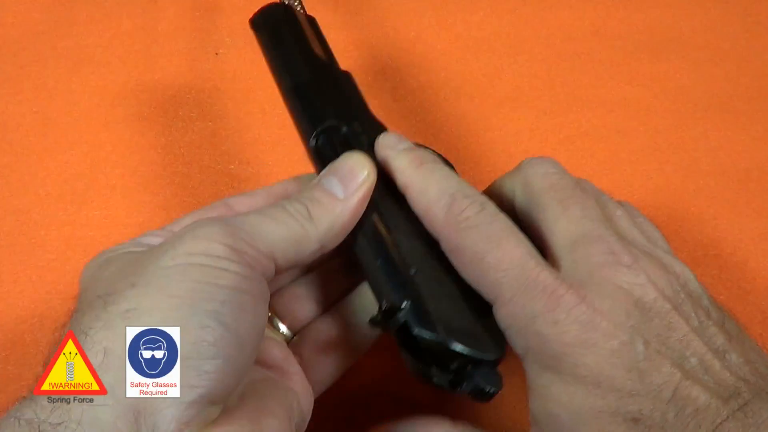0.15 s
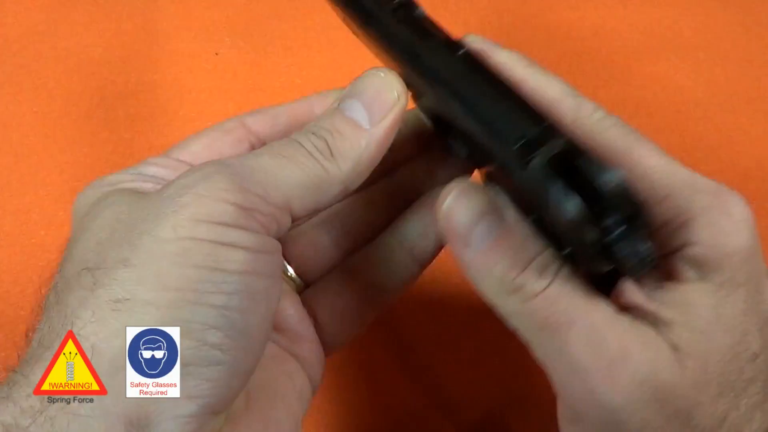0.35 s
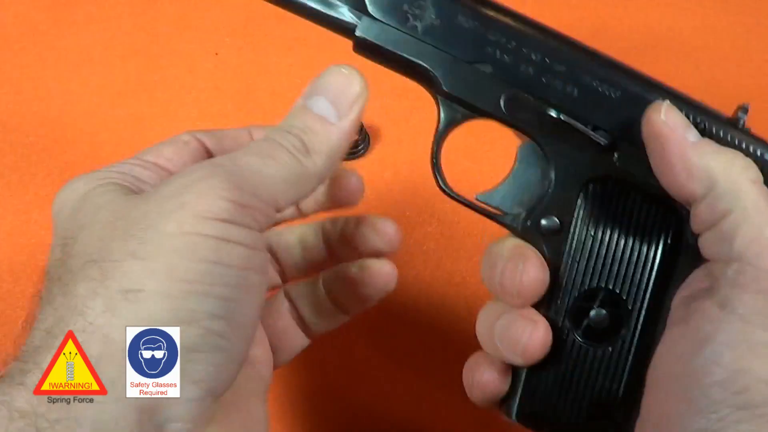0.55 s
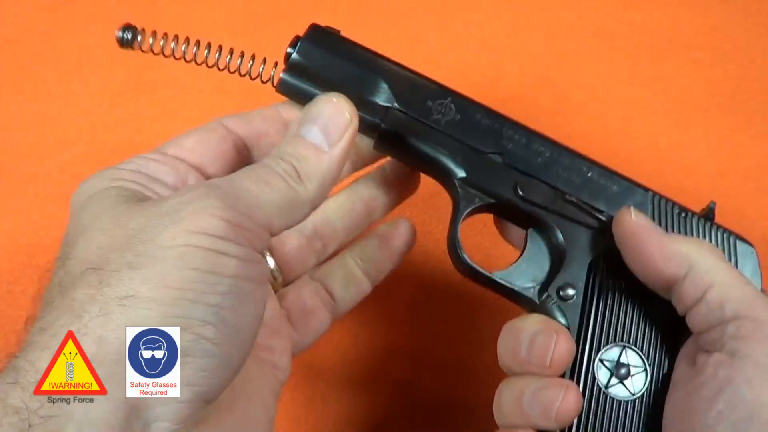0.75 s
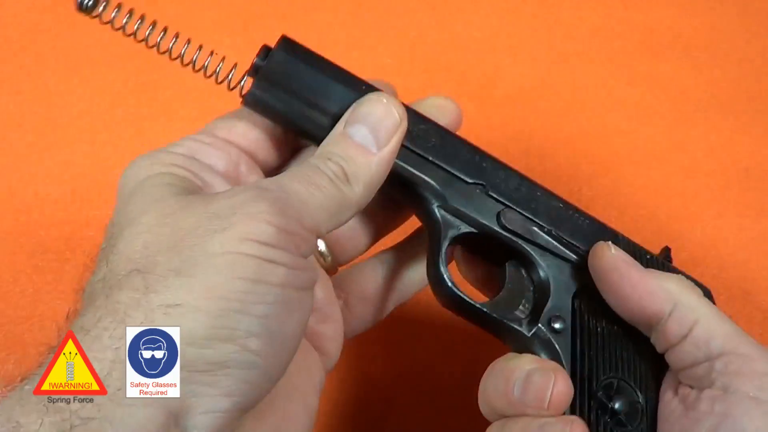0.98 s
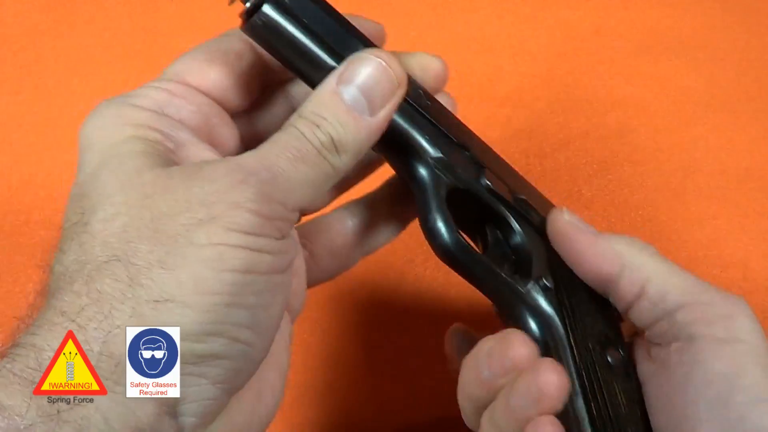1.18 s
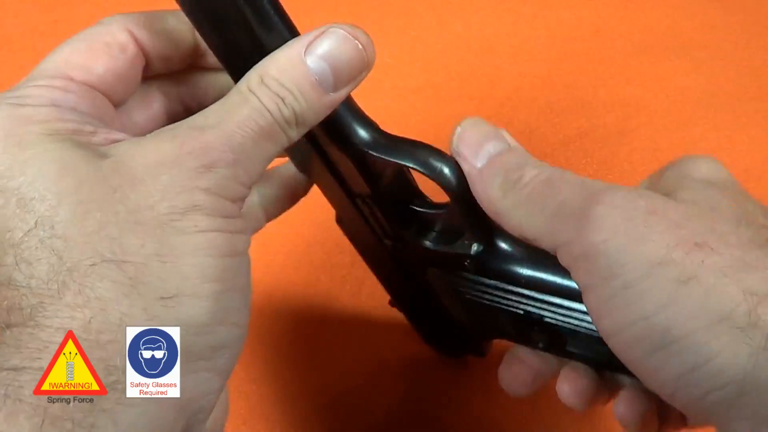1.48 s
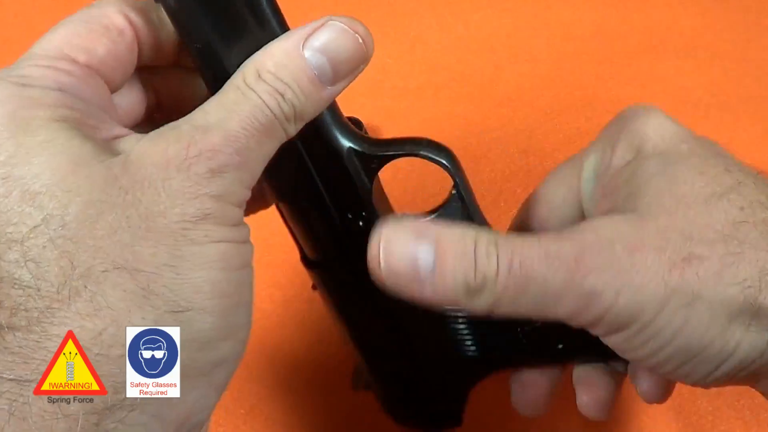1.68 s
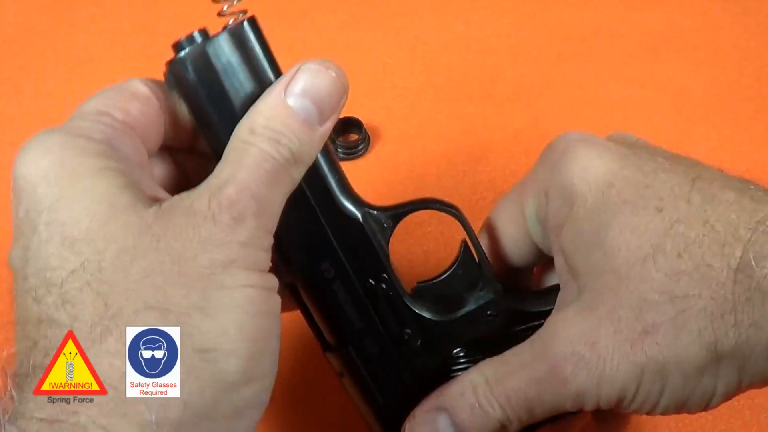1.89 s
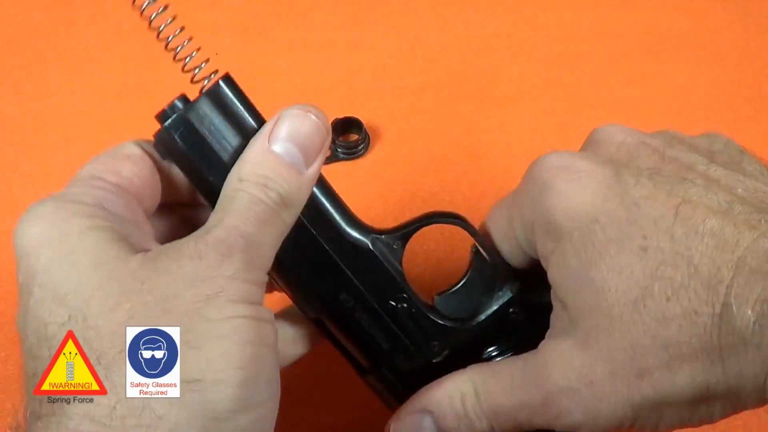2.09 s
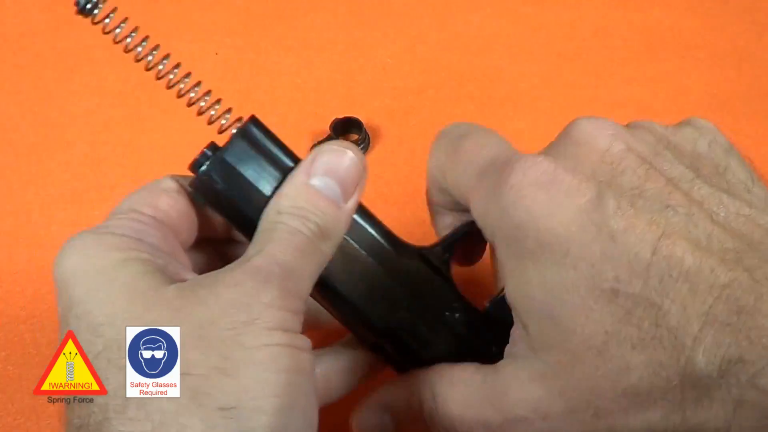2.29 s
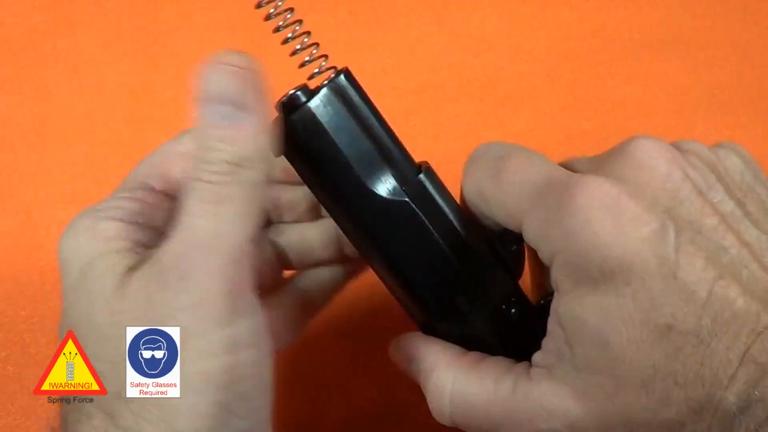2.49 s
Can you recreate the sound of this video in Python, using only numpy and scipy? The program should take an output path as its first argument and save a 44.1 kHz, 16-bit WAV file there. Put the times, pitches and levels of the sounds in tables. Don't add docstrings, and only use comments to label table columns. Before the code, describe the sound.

Loose steel pistol parts rattle, click and scrape as hands turn the gun over close by

```python
import sys
import numpy as np
from scipy import signal
from scipy.io import wavfile
from scipy.ndimage import uniform_filter1d

SR = 44100
rng = np.random.default_rng(int(sys.argv[2]) if len(sys.argv) > 2 else 0)


def master(y):
    cut = np.clip(np.atleast_2d(y).T, -1, 1)
    pcm = np.round(cut * 32767)
    wavfile.write(sys.argv[1], SR, pcm.astype(np.int16))


def how_loud(loudness_db):
    steps = np.asarray(loudness_db, float) / 20
    return 10 ** steps


N = 116865


def evened(x):
    return x / np.sqrt(np.mean(x ** 2) + 1e-20)


def read(points, hz):
    f, value = np.transpose(points)
    return np.interp(np.log(hz + 1), np.log(f + 1), value)


def add(mix, s, sound):
    part = mix[round(s * SR):][:len(sound)]
    part += sound[:len(part)]


def band(x, lo_hz, hi_hz, order=2):
    return signal.sosfilt(signal.butter(order, [lo_hz, hi_hz], "band", fs=SR, output="sos"), x)


def rings(modes, extra_db, detune=1):
    t = np.arange(1300) / SR
    hz, db, t60 = np.transpose(modes)[:, :, None]
    decay = how_loud(db + extra_db[:, None] - 60 * t / t60)
    return (decay * np.sin(2 * np.pi * hz * detune * t)).sum(0)


def contacts(luck, chance, spread_db=5):
    size = how_loud(-spread_db * np.log(luck[2] + 0.00085))
    return (luck[0] < chance) * np.sign(luck[1] - .5) * size


def knock(peak_db, low_db, ring_hz, chatter_ms, luck, place):
    # frequency in Hz, level in dB, decay time T60 in seconds.
    frame_modes = [(1280, -7, .012), (2300, -7, .016), (3720, -6, .011), (4740, -8, .011)]
    # frequency in Hz, level in dB, decay time T60 in seconds.
    slide_modes = [(7310, -5, .018), (8700, 2, .022), (9780, -3, .012), (11120, -3, .018)]
    registers = (1250, 5800), (5800, 13800)
    scatter_db, detune = 6., .01
    spot_db, spot_t60 = 4., .012
    dense_db, dense_t60 = -5., .011
    contacts_per_s, grind = 3200, 16.0

    t = np.arange(luck.shape[1]) / SR
    held_s = 0.88 * max(chatter_ms, .5) / 1000
    shape = np.minimum(t / 0.0012, 1) * np.exp(-(t / held_s) ** 2)
    drive = shape * (contacts(luck, contacts_per_s / SR) + grind * (luck[3] - .5))
    parts = []
    for (louder, shift), modes, (lo, hi) in zip(place, (frame_modes, slide_modes), registers):
        spot = [(ring_hz, spot_db if lo < ring_hz < hi else -40, spot_t60)]
        dense = []
        for u in shift[len(modes) + 1:]:
            hz = (lo + hi + (hi - lo) * (u + u ** 3) / 2) / 2
            dense.append((hz, dense_db, dense_t60))
        steel = rings(modes + spot + dense, scatter_db * louder, 1 + detune * shift[:, None])
        ring = band(signal.fftconvolve(drive, steel), lo, 1.15 * hi)
        loudest = np.sqrt(uniform_filter1d(ring ** 2, size=88).max())
        parts.append(ring / loudest)
    share = min(how_loud(low_db), .97)
    return how_loud(peak_db - 1) * (share * parts[0] + np.sqrt(1 - share ** 2) * parts[1])


def knocks():
    # time in seconds, peak in dB, share of the frame in dB,
    # loudest ring in Hz, chatter in ms.
    firm_knocks = [(0.2332, -21.5, 1.9, 3230, 1.9), (0.2989, -22.5, -7.5, 8100, 4.2),
                   (0.3144, -22.5, -3, 7040, 1.1), (0.3599, -14, -8.5, 9060, 8.9),
                   (0.429, -13, -15.5, 9600, 0.73), (0.4405, -20.5, -8.5, 2630, 1.4),
                   (0.515, -16, -2.5, 8360, 0.85), (0.575, -22.5, -11, 10840, 5), (0.63, -16.5, -5, 8730, 3.9),
                   (0.6504, -13, -43, 6000, 2.9), (0.7022, -12.5, -8, 8800, 8.4),
                   (0.7213, -21.5, -6, 5670, 3.4), (0.7948, -14, -12, 9060, 2.8),
                   (0.933, -15.5, -47, 9030, 1.25), (0.9496, -23.5, -8, 4700, 3.7),
                   (1.0273, -14, -6, 7360, 10.8), (1.045, -19, 2, 7600, 4.2), (1.049, -14.5, -10.5, 7380, 4.5),
                   (1.2141, -22.5, 1.5, 2430, 3.8), (1.239, -23.5, -11, 6800, 4.5),
                   (1.2917, -24, -2, 6660, 0.85),
                   (1.295, -18, -39, 7070, 5.2), (1.3338, -15, -5.5, 4540, 1.43),
               (1.34, -20, -4.5, 10900, 15.3), (1.4093, -13, -16.5, 9960, 5),
               (1.4722, -25, -25, 7400, 11.4), (1.5139, -18, -10, 9800, 4), (1.5347, -22, -8.5, 9500, 6.4),
               (1.541, -19, -14, 12450, 6.9), (1.5499, -12.5, -8, 8700, 7.6),
               (1.6037, -20, -12, 8600, 12.4), (1.7645, -21.5, -18.5, 10240, 5.5),
               (1.8375, -23, -11.5, 6250, 7), (1.8439, -19, -10, 9150, 6.9),
               (1.8948, -21.5, -47, 7900, 8.7), (1.9232, -13.5, -17.5, 7950, 1.9),
               (1.9685, -18, -14.5, 8600, 7.8), (1.9814, -22, -11.5, 8800, 13),
               (2.2854, -17.5, -53, 8500, 8.2), (2.3029, -17, -50, 7330, 1.7),
               (2.3706, -22, -48, 8200, 5.7), (2.379, -19, -12, 8850, 1.9)]
    # time in seconds, peak in dB, loudest
    # ring in Hz.
    light_ticks = [(0.0204, -41.5, 3400), (0.1054, -47, 1930), (0.2227, -36, 3900), (0.2463, -39, 3400),
                   (0.253, -32, 10900), (0.261, -38, 9200), (0.3305, -32.5, 4840), (0.3426, -32.5, 2500),
                   (0.49, -33, 2460), (0.563, -36.5, 1230), (0.583, -45, 11100), (0.6597, -24, 8600),
                   (0.6848, -31, 8650), (0.7603, -27.5, 1280), (0.833, -58, 4770), (0.856, -32.5, 7900),
                   (0.8766, -26, 9050), (0.8933, -34, 11700), (0.965, -40, 4600), (1.074, -32, 8900),
                   (1.095, -24, 8200), (1.1325, -39, 3500), (1.1504, -21, 7440), (1.162, -25, 7300),
                   (1.1697, -23, 6950), (1.1967, -28.5, 2350), (1.27, -24, 11400), (1.2823, -26, 11280),
                   (1.3943, -36, 12800),
                   (1.441, -38, 2190), (1.487, -35.5, 2350), (1.533, -27, 8400), (1.6857, -35, 8950),
                  (1.692, -33.5, 8560), (1.75, -32.5, 8200), (1.8172, -31, 9300), (1.832, -22, 8450),
                  (1.909, -23, 9600), (1.9364, -30, 2530), (2.012, -31, 8680), (2.0285, -24, 9600),
                  (2.045, -27, 8900), (2.07, -30.5, 8800), (2.1012, -24, 9170), (2.1217, -28, 8900),
                  (2.151, -24.5, 8700), (2.1715, -29, 7600), (2.227, -23.5, 8600), (2.244, -26, 8650),
                  (2.246, -34.5, 8600), (2.365, -25, 9100), (2.4086, -31.5, 8950), (2.4537, -32.5, 3830),
                  (2.4732, -29.5, 4870), (2.5, -42, 9600), (2.5459, -42, 1720), (2.5853, -34, 10900),
                  (2.623, -31.5, 10150),
                   (0.212, -41, 9350), (0.2745, -48, 10000), (0.4222, -35, 9000), (.48, -35, 8800),
               (.496, -38, 10900), (.588, -47, 10900), (0.788, -34, 8000), (0.906, -35, 9000),
               (1.063, -25, 1450), (1.078, -27.5, 1880), (1.105, -29, 10100), (1.425, -26.5, 10500),
               (1.431, -38, 3770), (1.743, -36, 10600), (1.774, -37, 10750), (1.786, -36, 6000),
               (1.857, -32, 10400), (1.997, -24, 11000), (2.212, -47, 6200), (2.335, -41, 6200),
               (2.395, -47, 8000), (2.43, -48, 1700), (2.441, -40, 9100), (2.575, -41.5, 9800),
               (2.596, -44, 7400), (2.647, -41, 9000)]
    dull_db, bright_db, tick_ms = -2.5, -19.5, 6.46

    ticks = []
    for s, peak_db, hz in light_ticks:
        low_db = dull_db if hz < 5000 else bright_db
        ticks.append((s, peak_db, low_db, hz, tick_ms))
    out = np.zeros(N)
    for s, *row in firm_knocks + ticks:
        luck = rng.random((4, 1000))
        place = rng.uniform(-1.186, 1, (2, 2, 22))
        add(out, s - .0007, knock(*row, luck, place))
    sparkle = how_loud(6) * band(out, 14000, 19000)
    return band(out + sparkle, 1120, 17500)


def ring_on(x):
    # frequency in Hz, share in dB, decay time T60 in seconds.
    free_rings = [(8705, 7, 0.08)]
    out = x
    for hz, db, t60 in free_rings:
        r = how_loud(-60 / (t60 * SR))
        w = 2 * np.pi * hz / SR
        ring = signal.lfilter([(1 - r) * np.sin(w)], [1, -2 * r * np.cos(w), r * r], x)
        out = out + how_loud(db) * ring
    return out


def pings():
    # time in seconds, peak in dB, frequency in Hz, decay time T60 in seconds.
    lone_rings = [(0.2341, -27.5, 3147, 0.027), (0.3427, -31, 2426, 0.043), (.361, -38, 13000, 0.065),
                  (1.551, -22, 1625, 0.019), (.54, -39, 1240, 0.12), (0.792, -24, 4270, 0.034),
                  (0.952, -17, 4420, 0.018), (1.046, -17, 1960, 0.038), (1.175, -26, 4310, 0.029),
                  (1.443, -25.5, 2300, 0.057), (1.489, -34, 2260, 0.043), (1.513, -22, 5520, 0.024),
                  (1.516, -36.5, 2335, 0.12), (1.567, -42.5, 4860, 0.34), (1.6565, -48, 3316, 0.37),
                  (1.984, -29.5, 1716, 0.027), (2.149, -33.5, 1510, 0.023), (2.472, -36, 1810, 0.018),
                  (0.951, -42, 545, 0.057)]
    rise_s = 0.0013
    out, t = np.zeros(N), np.arange(9000) / SR
    for s, db, hz, t60 in lone_rings:
        rough = 1 + .6 * evened(uniform_filter1d(rng.standard_normal(len(t)), size=70))
        swell = how_loud(db - 60 * t / t60) * np.minimum(t / rise_s, 1)
        add(out, s, swell * rough * np.sin(2 * np.pi * hz * t))
    return out


def scrapes():
    # start in seconds, length in seconds, level in dB.
    strokes = [(0.363, 0.088, -35), (0.421, 0.069, -34), (0.65, 0.047, -43), (0.706, 0.1, -38),
               (1.02, 0.13, -39.5), (1.154, 0.11, -42), (1.355, 0.099, -43), (1.405, 0.085, -41.5),
               (1.478, 0.031, -36.5), (1.594, 0.037, -37), (1.762, 0.036, -54), (1.82, 0.041, -45),
               (1.972, 0.059, -39), (2.1, .03, -54), (2.363, .03, -35.5)]
    sing_hz, sing_db, touches_per_s = 8780, -9, 2200
    t = np.arange(N) / SR
    touch = contacts(rng.random((3, N)), touches_per_s / SR, 2.2)
    grit = signal.lfilter([1], [1, -.97], abs(touch)) * rng.standard_normal(N)
    sing = band(grit, sing_hz - 70, sing_hz + 70, order=1)
    wash = evened(band(grit, 3240, 10300)) + how_loud(sing_db) * evened(sing)
    swell = np.zeros(N)
    for s, length, db in strokes:
        swell += how_loud(db) * np.sin(np.pi * np.clip((t - s) / length, 0, 1) ** 0.28)
    return wash * swell


def rustle():
    # time in seconds, level in dB.
    restlessness = [
        (.15, -59),
        (.4, -47.5),
        (1.6, -49),
        (2.65, -53.5),
    ]
    ticks_per_s = 600
    touch = contacts(rng.random((3, N)), ticks_per_s / SR, 1.4)
    grit = signal.lfilter([1], [1, -.99], abs(touch)) * rng.standard_normal(N)
    s, db = np.transpose(restlessness)
    return how_loud(np.interp(np.arange(N) / SR, s, db)) * evened(band(grit, 2040, 12000))


def slips():
    # time in seconds, peak in dB.
    thumps = [
        (0.158, -37),
        (0.176, -37),
        (0.214, -38.5),
        (0.265, -33.5),
        (0.287, -33.5),
        (0.346, -39),
        (0.396, -39),
    ]
    table_hz, table_t60 = 244, 0.039
    out, t = np.zeros(N), np.arange(3000) / SR
    for s, db in thumps:
        hz = table_hz * rng.uniform(.92, 1.15)
        swell = how_loud(db - 60 * t / table_t60) * np.minimum(t / 0.004, 1)
        add(out, s, swell * np.sin(2 * np.pi * hz * t))
    return out


def rubs():
    # middle in seconds, half length in seconds, level in dB, lowest and highest frequency in Hz.
    strokes = [
        (0.957, 0.026, -48.5, 150, 646),
        (2.037, 0.055, -49.5, 596, 1030),
        (2.48, 0.13, -55, 220, 1100),
    ]
    t = np.arange(N) / SR
    lumps = abs(uniform_filter1d(rng.standard_normal(N), size=300))
    skin = lumps * rng.standard_normal((2, N))
    out = np.zeros((2, N))
    for s, half, db, lo, hi in strokes:
        out += how_loud(db) * np.exp(-((t - s) / half) ** 2) * evened(band(skin, lo, hi))
    return out


def room(x):
    t60 = 0.16
    t = np.arange(SR // 2) / SR
    sign = np.sign(rng.standard_normal((3, len(t))))
    taps = sign * (rng.random((3, len(t))) < .05) * (t > .002)
    tail = (taps[:2] + 0.8 * taps[2]) * how_loud(-60 * t / t60)
    return signal.fftconvolve(x[None], tail / np.linalg.norm(tail[0]), axes=1)[:, :N]


def air():
    # frequency in Hz, level in dB per Hz.
    spectrum = [(15, -58), (25, -18.5), (123, -3.5), (206, -3.5), (1020, -11), (1440, -9.5), (6000, -19.5),
                (16000, -34)]
    # frequency in Hz, likeness of left and right from 0 to 1.
    likeness = [(40, 0.96), (150, 0.9), (500, 0.047), (4000, 0.13)]
    air_db, whine_hz, whine_db = -51, 15735, -66.
    hz = np.fft.rfftfreq(1024, 1 / SR)
    a, b, c, d, patches = rng.standard_normal((N // 256 + 5, 513, 5)).T
    patches = uniform_filter1d(uniform_filter1d(patches, size=8, axis=0), size=20, axis=1)
    same = np.clip(read(likeness, hz), -1, 1)[:, None]
    left = a + 1j * b
    right = same * left + np.sqrt(1 - same ** 2) * (c + 1j * d)
    z = np.array([left, right]) * how_loud(read(spectrum, hz)[:, None] + 1.87 * evened(patches))
    hiss = signal.istft(z, nperseg=1024, noverlap=768)[1][:, :N]
    whine = how_loud(whine_db) * np.sin(2 * np.pi * whine_hz * np.arange(N) / SR)
    return how_loud(air_db) * evened(hiss) + whine


def scene():
    # time in seconds, left over right in dB.
    drift = [
        (1.5, -.1),
        (2.1, 1.4),
        (2.65, .7),
    ]
    near = ring_on(knocks() + rustle()) + pings() + scrapes()
    lean_db = np.interp(np.arange(N) / SR, *np.transpose(drift)) / 2
    pistol = near * how_loud(np.array([lean_db, -lean_db]))
    return pistol + slips() + rubs() + how_loud(-12) * room(near) + air()


def band_limit(x):
    return signal.sosfilt(signal.butter(12, 16980, fs=SR, output="sos"), x)


def record(dry):
    edge_hz = 15980
    low_pass = signal.firwin(511, edge_hz, window=("kaiser", 5), fs=SR)
    cut = signal.oaconvolve(dry, low_pass[None], "same")
    return band_limit(cut + how_loud(-36) * (dry - cut))


dry = scene()
out = record(dry)
master(out)
```